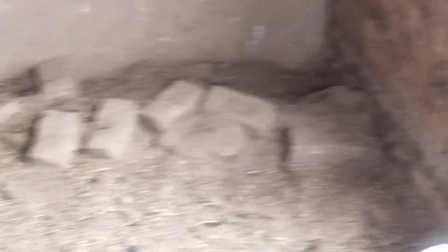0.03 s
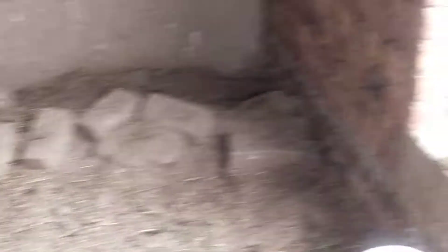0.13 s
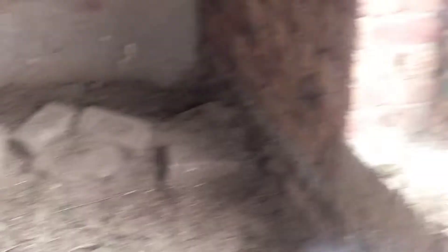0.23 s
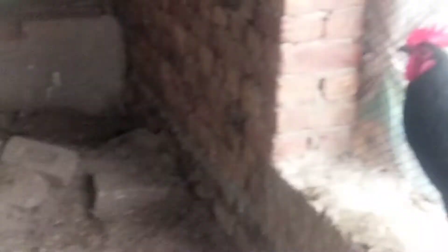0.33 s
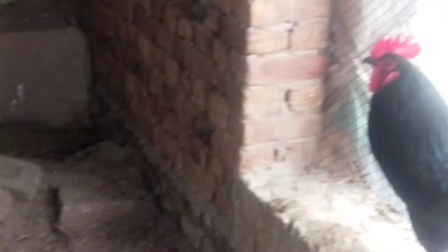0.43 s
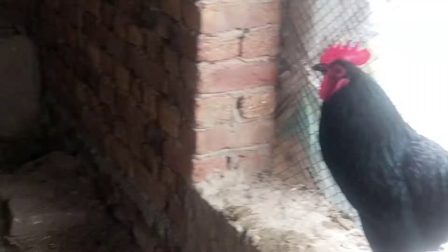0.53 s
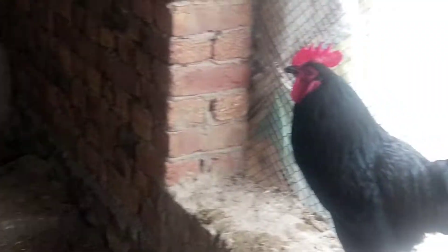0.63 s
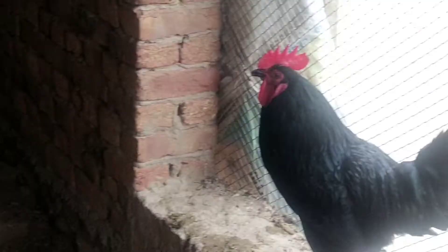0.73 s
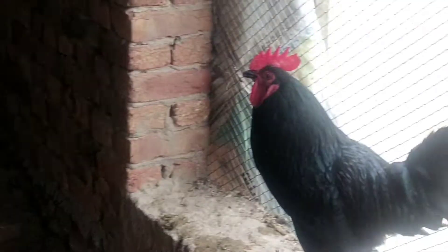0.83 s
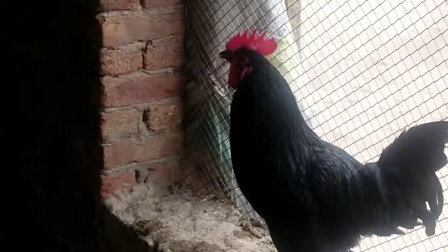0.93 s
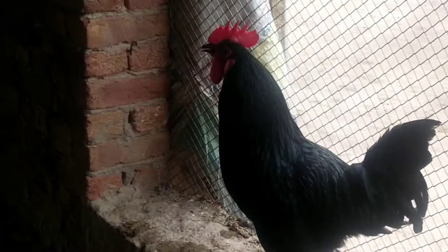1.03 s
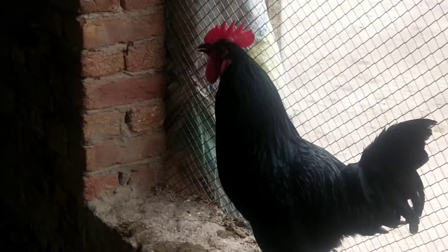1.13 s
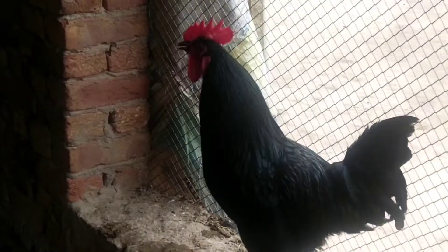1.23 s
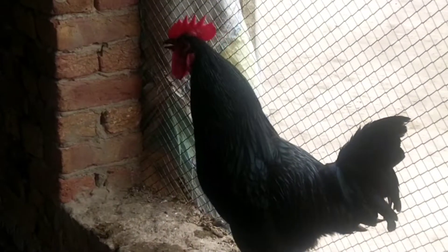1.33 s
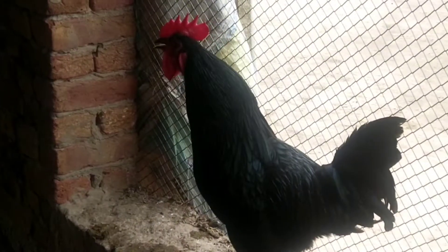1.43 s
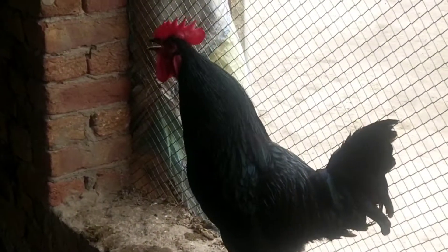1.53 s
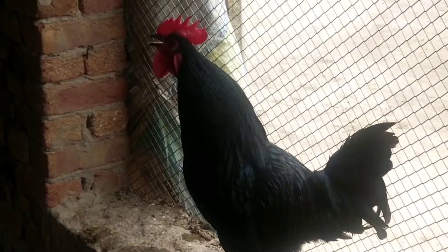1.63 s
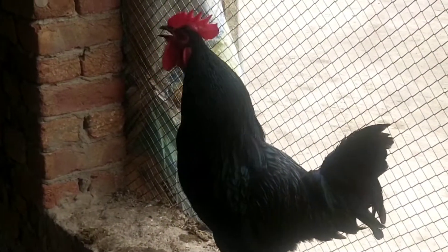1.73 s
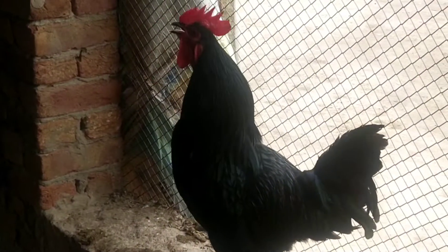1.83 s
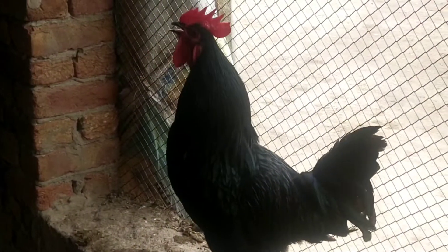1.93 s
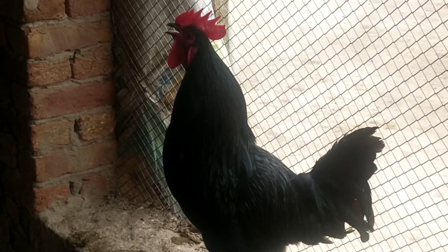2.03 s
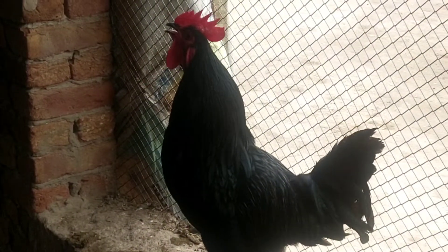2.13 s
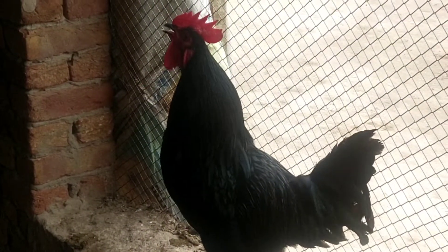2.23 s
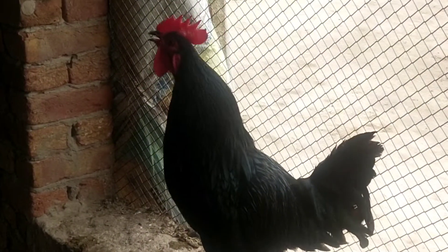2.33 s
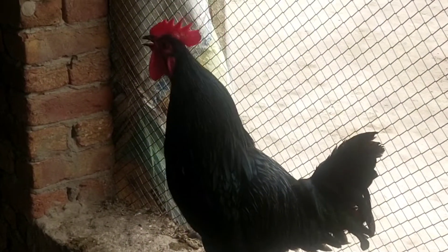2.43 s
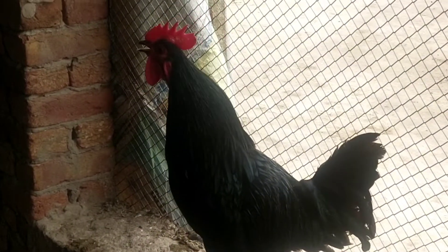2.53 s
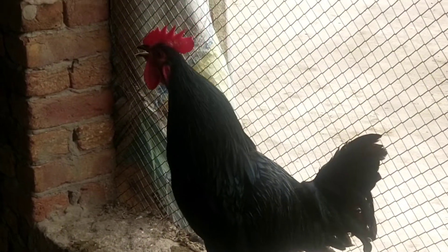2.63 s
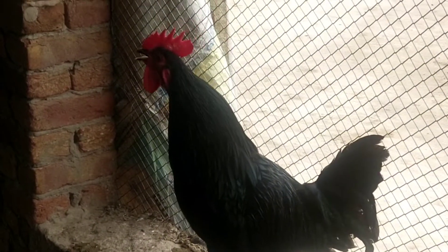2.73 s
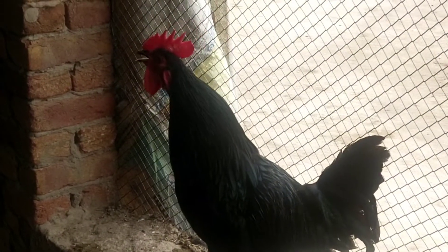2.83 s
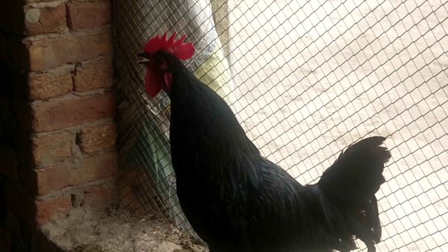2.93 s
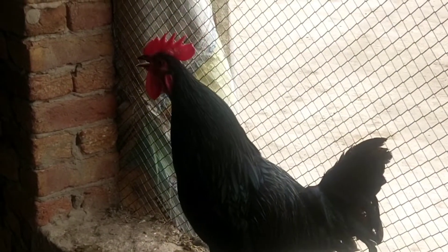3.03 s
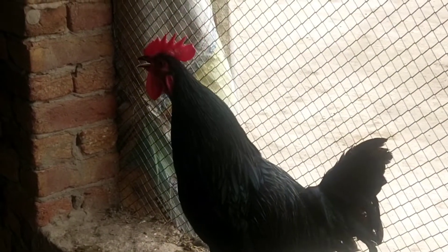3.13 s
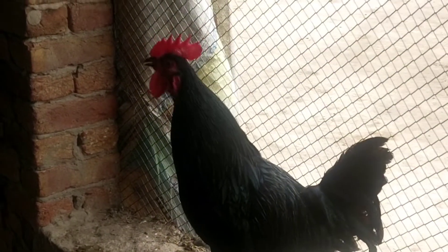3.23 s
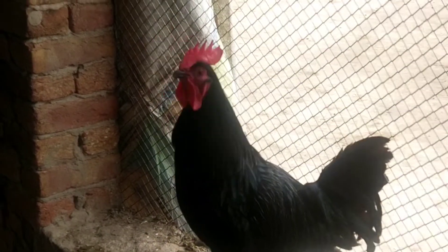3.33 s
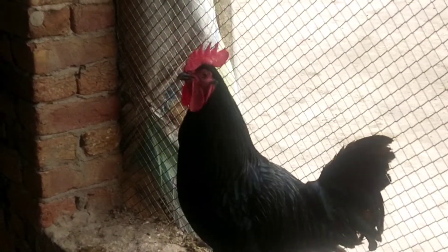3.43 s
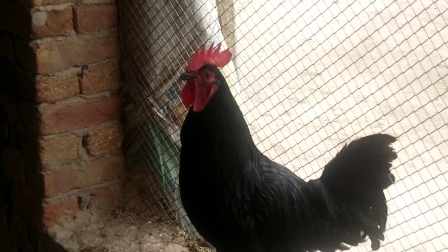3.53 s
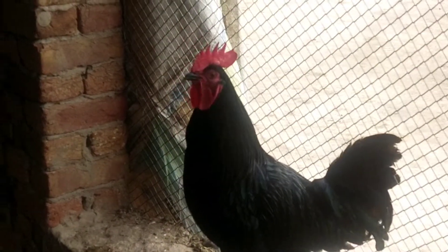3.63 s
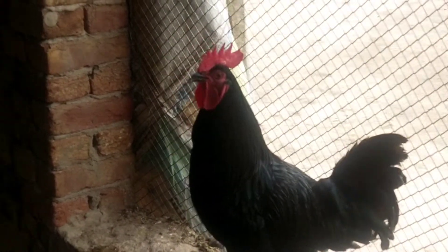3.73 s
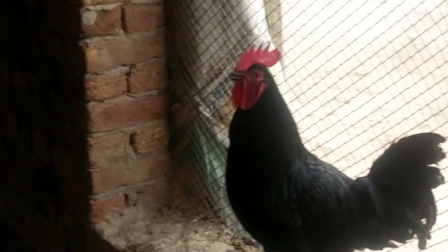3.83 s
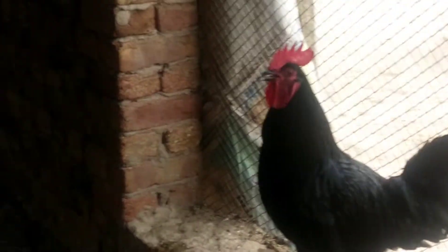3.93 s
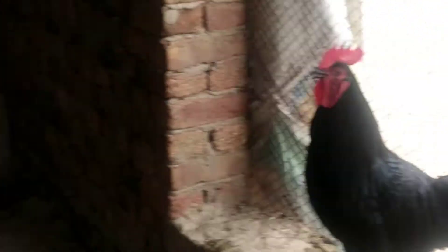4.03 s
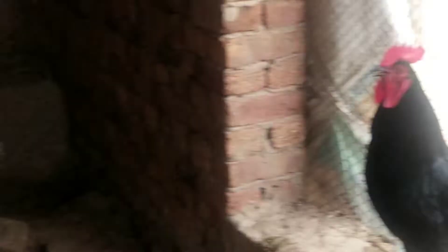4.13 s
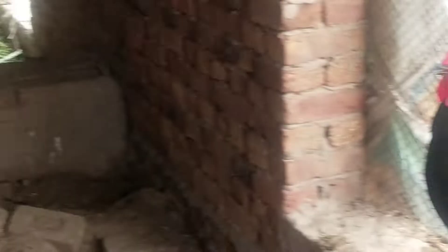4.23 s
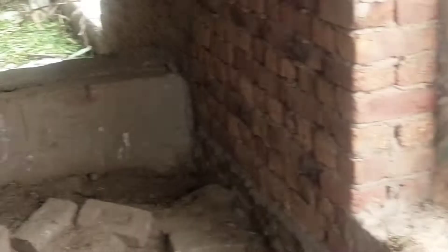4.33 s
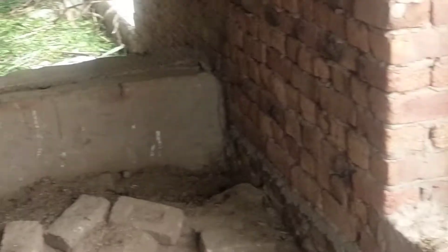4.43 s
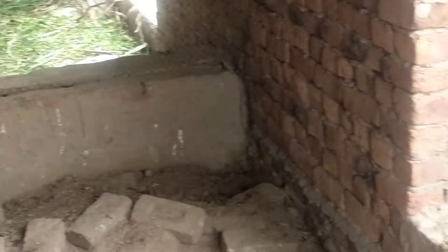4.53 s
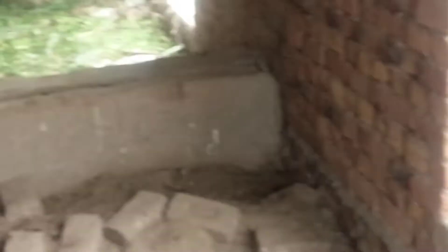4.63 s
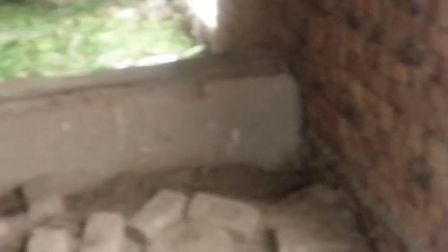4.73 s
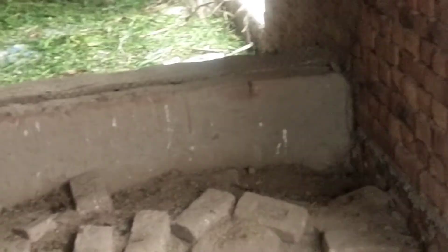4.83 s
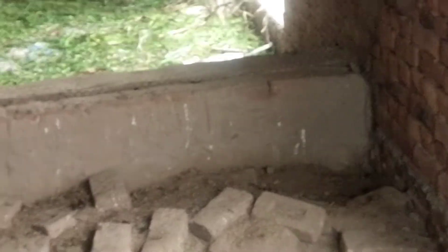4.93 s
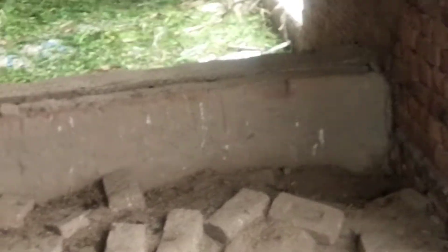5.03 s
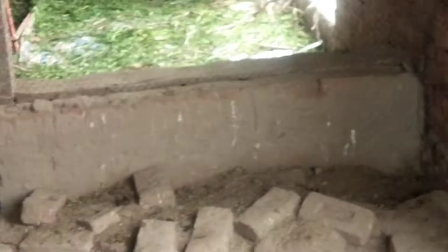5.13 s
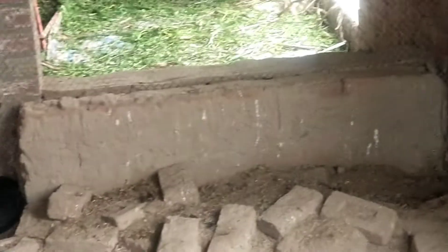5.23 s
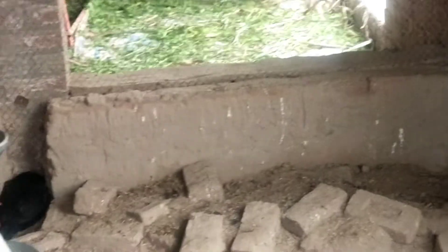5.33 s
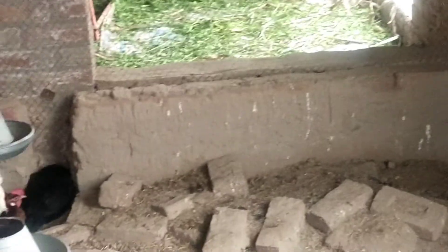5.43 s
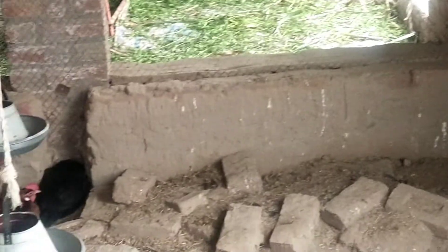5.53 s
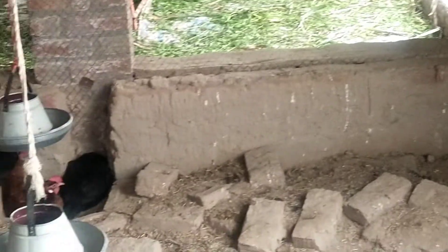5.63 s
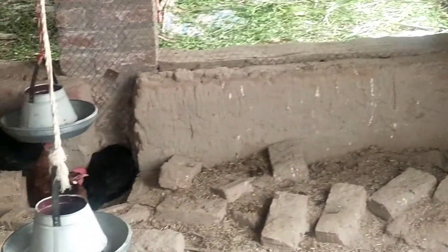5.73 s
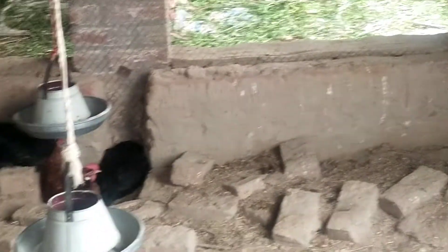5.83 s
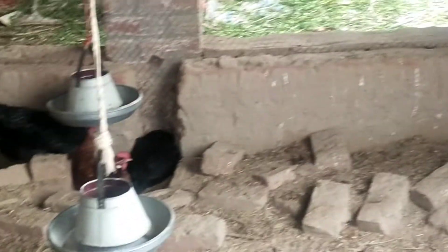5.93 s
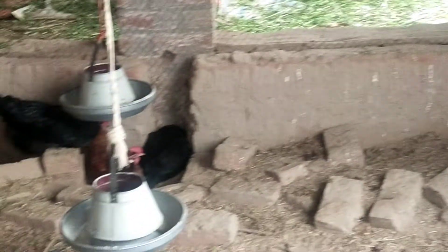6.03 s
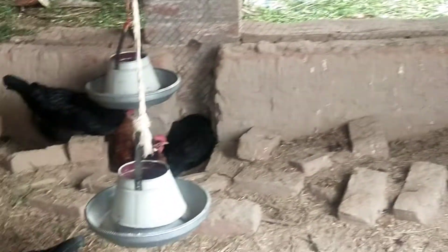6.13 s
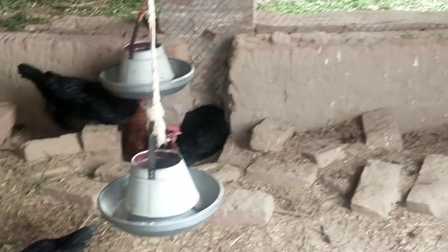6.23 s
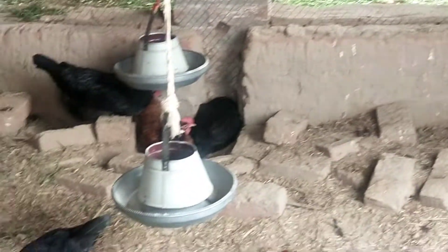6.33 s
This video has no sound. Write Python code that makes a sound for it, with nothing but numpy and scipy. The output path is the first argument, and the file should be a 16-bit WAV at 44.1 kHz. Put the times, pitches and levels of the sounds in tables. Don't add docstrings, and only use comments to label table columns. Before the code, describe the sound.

A soft yard rumble with faint hiss, rustling straw and thin distant bird wheezes opens the scene, heard through hand-held stereo microphones in a small brick pen. Dull beak taps on a tin feeder fall at about 0.1 and 0.8 s. From 1.1 to 1.55 s two hens murmur low with closed beaks. At 1.5 s a rooster a couple of metres away crows loudly: a rough, buzzing first syllable, a leap to a higher, whistling second at 1.85, a lower, growling third from 2.3, and a clearer last one from 2.85 to 3.2 s. He draws in air with a quiet low croon until 3.65 s. Near quiet follows with faint rustling. Around 4.85-5.55 s claws scratch gritty litter and small stones knock. From 5.87 to 6.25 s sharp, damped tin pecks ring out, slightly left, with a hen's short cluck near 6.0 s.

```python
import sys
import numpy as np
from scipy import signal
from scipy.fft import rfft, irfft
from scipy.io import wavfile
from scipy.ndimage import uniform_filter1d, minimum_filter1d, map_coordinates

SR = 44100
rng = np.random.default_rng(int(sys.argv[2]) if len(sys.argv) > 2 else 0)


def nominal_scale(level):
    x = np.asarray(level, float) / 20
    return 10 ** x


def file_out(sig):
    cols = np.atleast_2d(sig).T
    lim = np.clip(cols, -1, 1)
    pcm = np.round(lim * 32767).astype(np.int16)
    wavfile.write(sys.argv[1], SR, pcm)


N = 282240


def rms_one(x):
    return x / np.sqrt(np.mean(x ** 2) + 1e-20)


def in_time(rows):
    s, *columns = np.transpose(rows)
    return [np.interp(np.arange(N) / SR, s, c) for c in columns]


def gate(rows, fade_s):
    t = np.arange(N) / SR
    return np.clip(np.minimum(t - rows[0][0], rows[-1][0] - t) / fade_s, 0, 1)


def swell(s, rise_s, fall_s):
    t = np.arange(N) / SR - s
    before, after = -t / max(rise_s, .002), t / max(fall_s, .002)
    return nominal_scale(-30 * np.maximum(before, after))


def at_hz(points, hz):
    known_hz, value = np.transpose(points)
    return np.interp(np.log(hz + 1e-9), np.log(known_hz), value)


def drift(rate_hz):
    r = np.exp(-2 * np.pi * rate_hz / SR)
    noise = rng.standard_normal(N + SR)
    return rms_one(signal.lfilter([1], [1, -2 * r, r * r], noise)[SR:])


def filtered(x, order, hz, kind="low"):
    return signal.sosfilt(signal.butter(order, hz, kind, fs=SR, output="sos"), x)


def coloured(x, spectrum):
    return irfft(rfft(x) * nominal_scale(at_hz(spectrum, np.fft.rfftfreq(N, 1 / SR))), N)


def ring(clicks, hz, t60):
    r, w = nominal_scale(-60 / (t60 * SR)), 2 * np.pi * hz / SR
    return signal.lfilter([0, np.sin(w)], [1, -2 * r * np.cos(w), r * r], clicks + 1e-18)


def die_away(clicks, t60):
    return signal.lfilter([1], [1, -nominal_scale(-60 / (t60 * SR))], clicks)


# (frequency [Hz], likeness [0-1])
LIKENESS = [(60, 0.96), (150, 0.95), (380, 0.78), (950, 0.1), (2380, 0.02), (5980, 0.03), (15000, 0.03)]


def diffuse(spectrum):
    alike = np.clip(at_hz(LIKENESS, np.fft.rfftfreq(N, 1 / SR)), -1, 1)
    mid, side = rfft(coloured(rng.standard_normal((2, N)), spectrum))
    ears = np.sqrt(1 + alike) * mid + np.sqrt(1 - alike) * side * [[1], [-1]]
    return rms_one(irfft(ears, N))


def placed(x, balance, lag_s):
    hz = np.fft.rfftfreq(N, 1 / SR)
    half = nominal_scale(at_hz(balance, hz) / 2)
    left = half * np.exp(-2j * np.pi * hz * at_hz(lag_s, hz))
    return irfft(rfft(x) * np.array([left, 1 / half]), N)


PEN_T60_S, WALL_CUT_HZ = 0.3, 1700


def pen(x):
    t = np.arange(SR // 2) / SR
    onset = np.clip((t - .004) / 0.0015, 0, 1)
    noise = diffuse([(120, -28.5), (300, -0.5), (16000, 10.0)])[:, :len(t)] * onset
    dull = filtered(noise, 1, WALL_CUT_HZ)
    tail = dull * nominal_scale(-60 * t / PEN_T60_S) + 0.15 * (noise - dull) * nominal_scale(-110 * t / PEN_T60_S)
    return signal.fftconvolve(x[None], rms_one(tail) / np.sqrt(len(t)), axes=1)[:, :N]


# (time [s], level [dB])
YARD = [(0.0, -50), (0.05, -47.5), (0.39, -51.5), (0.46, -55.5), (0.71, -47.5), (1.87, -48.5), (1.96, -62),
        (2.62, -54), (3.92, -72.5), (4.06, -57.5), (4.15, -73.5), (6.02, -63.5), (6.11, -56.5), (6.4, -54)]
# (frequency [Hz], level [dB per Hz])
RUMBLE = [(18, -60.5), (30, -30), (52, -23.5), (108, -13), (144, -11), (208, -5.5), (402, -11),
          (524, -24.5), (700, -14.5), (910, -36.5), (1540, -120)]
# (frequency [Hz], level [dB per Hz])
AIR = [(260, -29), (450, -19.5), (664, -11), (979, -8), (1340, -12.5), (2030, -14.5), (2540, -14.5),
       (3020, -18.5), (3340, -18), (5450, -29.5), (9000, -33.5), (11700, -52.5), (19800, -120)]
# (frequency [Hz], level [dB per Hz])
RUSTLE = [(3000, -42), (5000, -7.5), (7000, -1), (11000, -7), (15500, -3), (18000, -31.5)]
# (frequency [Hz], level [dB per Hz])
HISS = [(1760, -44.5), (3000, -16.5), (4090, -4.5), (4470, -16.5), (7590, -7), (11300, -17.5),
        (15500, -12.5)]
# (start [s], end [s], level [dB])
CHEST = (1.525, 2.9, -59)
# (time [s], rustle level [dB], spread [s], duller air level [dB])
STIRS = [(.02, -62.5, 0.24, -56.5), (0.292, -63.5, 0.2, -95), (.86, -84.5, 0.14, -58.5),
         (1.21, -64, 0.18, -64), (1.416, -53, 0.17, -59), (3.309, -73.5, 0.19, -50.5),
         (3.66, -82, 0.15, -84), (3.881, -73.5, 0.46, -77.5), (4.1, -71, 0.37, -71.5),
         (4.92, -93.5, 0.56, -62), (5.28, -86, 0.12, -57.5), (5.48, -96, 0.17, -58),
         (5.751, -65.5, 0.046, -69), (5.882, -70.5, 0.12, -68), (6.02, -53.5, 0.033, -73),
         (6.21, -64.5, 0.37, -65), (6.379, -62, 0.54, -62)]
RUMBLE_DB, DEEP_DB, AIR_DB = -3.5, -8, -15
HISS_DB = -77.5


def yard():
    yard_db, = in_time(YARD)
    boom = nominal_scale(yard_db + RUMBLE_DB) + nominal_scale(CHEST[2]) * gate([CHEST[:1], CHEST[1:]], 0.16)
    rumble = diffuse(RUMBLE)
    deep = signal.sosfiltfilt(signal.butter(3, 110, fs=SR, output="sos"), rumble)
    low = boom * nominal_scale(2.0 * drift(1.5)) * rms_one(rumble - deep)
    low = low + nominal_scale(yard_db + DEEP_DB + 2.0 * drift(13)) * rms_one(deep)
    stirs = np.array([swell(s, spread_s, spread_s) for s, _, spread_s, _ in STIRS]).T
    _, rustle_db, _, puff_db = np.transpose(STIRS)
    rustle, puffs = stirs @ nominal_scale(rustle_db), stirs @ nominal_scale(puff_db)
    air = (nominal_scale(yard_db + AIR_DB) + puffs) * nominal_scale(0.67 * drift(19)) * diffuse(AIR)
    air = air + rustle * nominal_scale(0.54 * drift(30)) * diffuse(RUSTLE)
    return low + (air + nominal_scale(HISS_DB) * diffuse(HISS) + wheezes()) * nominal_scale([[1.5], [-1.5]])


# (start [s], end [s], pitch [Hz], width [Hz], level [dB])
WHEEZES = [(.05, .6, 2620, 800, -69), (.55, 1.2, 2620, 900, -74), (.05, 1.3, 2300, 500, -74),
           (.1, 1.4, 1330, 600, -72), (5.24, 5.28, 1780, 260, -67), (3.89, 4.0, 1680, 600, -66),
           (3.97, 4.14, 1850, 900, -70), (3.89, 4.02, 2800, 900, -69), (3.89, 4.13, 3300, 2500, -73),
           (5.5, 5.87, 2320, 200, -75), (5.0, 5.3, 4100, 150, -88)]


def wheezes():
    out = np.zeros((2, N))
    for start, end, hz, width, db in WHEEZES:
        t60 = 9.5 / width
        narrow = ring(ring(rng.standard_normal((2, N)), hz, t60), hz, t60)
        out += nominal_scale(db + 0.59 * drift(3.8)) * gate([(start,), (end,)], 0.0052) * rms_one(narrow)
    return out


# (time [s], peak level [dB], left over right [dB], bright snap level [dB])
PECKS = [
    (0.091, -40, 9, -20),
    (0.794, -37, 5, -20),
    (0.854, -48, 23, -20),
    (5.7511, -68, 8, -10.5),
    (5.8671, -34.5, 7.5, -23),
    (6.0074, -26.5, 6.5, -8.5),
    (6.1659, -28, 4.5, -17),
    (6.213, -54, 7.5, 5),
    (6.2474, -30.5, 5.5, -13.5),
]
# (frequency [Hz], level [dB], ring time to -60 dB [s])
FEEDER = [(1820, -21, 0.061), (1890, -39, 0.31), (2166, 7, 0.26), (2670, 10, 0.25), (2836, 6, 0.23),
          (3120, -31, 0.19), (4030, -20, 0.047), (3910, 10, 0.82), (5335, -37, 5.0), (5640, -39, 0.34),
          (5560, -33, 0.18), (6340, -30, 0.43), (7470, -22.5, 0.12), (8300, -39, 0.15)]
# (frequency [Hz], level [dB per Hz])
CRACK = [(180, -58), (300, -1.5), (907, -6), (1240, -30), (1510, -5.5), (2790, 0), (5950, -15),
         (6900, -1.5), (8700, -24), (15500, -25.5)]
# (frequency [Hz], level [dB per Hz])
SNAP = [(4000, -31.5), (6000, -5), (8000, 0.5), (12000, -3.5), (15500, -17)]
# (until [s], cut [Hz])
TURNED_AWAY = (1.4, 3570)
PECK_RISE_S, SNAP_T60_S = .0015, 0.056


def pecks():
    at = [round(row[0] * SR) for row in PECKS]
    peak_db, pan_db, snap_db = np.array(PECKS)[:, 1:].T
    ears = nominal_scale(np.outer([.5, -.5], pan_db))

    def clicks(level_db):
        x = np.zeros((2, N))
        x[:, at] = nominal_scale(level_db) * ears
        return x

    luck = rng.normal(0, 1.0, (len(at), len(FEEDER)))
    out = np.zeros((2, N))
    for k, ((hz, db, t60), own_db) in enumerate(zip(FEEDER, luck.T)):
        struck = clicks(peak_db + db - 19.5 + own_db) * (-1) ** k
        out += ring(struck, hz, np.clip(t60, .015, .028))
    rise = np.exp(-1 / (PECK_RISE_S * SR))
    grain = signal.lfilter([1 - rise], [1, -rise], clicks(peak_db - 6) + 1e-18)
    out = out + (die_away(grain, .07) + 0.021 * die_away(grain, .3)) * diffuse(CRACK)
    out = out + die_away(clicks(peak_db - 6 + snap_db), SNAP_T60_S) * diffuse(SNAP)
    until_s, cut_hz = TURNED_AWAY
    return np.where(np.arange(N) < until_s * SR, filtered(out, 4, cut_hz), out)


def hum(rows, orders, wobble, fade_s=0.17, sway_db=3.0):
    pitch, level_db = in_time(rows)
    phase = np.cumsum(2 * np.pi * pitch * (1 + wobble * drift(40)) / SR)
    tone = 0
    for k, db in orders:
        tone = tone + nominal_scale(db - orders[0][1] + sway_db * drift(9.1)) * np.sin(k * phase + k * k)
    return np.sqrt(2) * nominal_scale(level_db) * gate(rows, fade_s) * tone


# (time [s], pitch [Hz], level [dB])
MURMUR = [(1.08, 196.7, -52), (1.116, 198, -46), (1.182, 214, -47.5), (1.4, 238.4, -46.5),
          (1.494, 211, -39.5), (1.51, 223, -82), (1.55, 212, -66)]
# (multiple [1], level [dB])
MURMUR_ORDERS = [(1, 8.5), (2, -3.5), (3, 2), (4, -13.5), (5, -18)]


def murmur():
    return hum(MURMUR, MURMUR_ORDERS, wobble=0.005)


# (time [s], pitch [Hz], level [dB])
ANSWER = [(1.25, 315, -61), (1.32, 323, -43.5), (1.42, 340, -47.5), (1.5, 324, -43), (1.56, 320, -67.5)]
# (multiple [1], level [dB])
ANSWER_ORDERS = [(1, 1), (2, -9), (3, -16), (4, -17), (6, -20)]


def answer():
    return hum(ANSWER, ANSWER_ORDERS, wobble=0.027)


# (start [s], half-pitch lines [dB], rasp under effort [dB])
REGIMES = [
    (1.501, -3.5, -23),
    (1.835, -31, -23),
    (1.96, -42, -24.5),
    (2.201, -30, -26),
    (2.297, -41.5, -16.5),
    (2.45, -0.5, -27),
    (2.619, 0.5, -27.5),
    (2.863, -25.5, -29.5),
]
SETTLE_S = .03


def by_regime(table):
    starts = np.array(REGIMES)[:, 0]
    now = np.maximum(np.searchsorted(starts, np.arange(N) / SR) - 1, 0)
    return [uniform_filter1d(c[now], size=round(SETTLE_S * SR)) for c in np.transpose(table).astype(float)]


# (pitch wobble [0-1], breath level [dB])
UNSTEADY = [(.24, -14), (.27, -17), (.3, -16), (.13, -23), (.14, -18), (.025, -23), (.025, -23), (.04, -31)]
# (start [s], end [s], strength [0-1])
BREAKS = [
    (1.48, 1.57, .7),
    (1.715, 1.85, .75),
    (2.28, 2.33, .4),
    (2.41, 2.47, .15),
    (2.83, 2.885, .12),
    (3.14, 3.3, .7),
]
BREAK_FADE_S, BREAK_WOBBLE, BREAK_BREATH_DB, BREAK_HALF_DB = .03, 1.05, -3, -8
THROB_DB_PER_WOBBLE, THROB_TOP_DB = 17, 6.5


def membranes():
    half_db, rasp_db, wobble, breath_db = by_regime(np.hstack([REGIMES, UNSTEADY])[:, 1:])
    broken = sum(k * gate([(a,), (b,)], BREAK_FADE_S) for a, b, k in BREAKS)
    wobble = wobble + broken * (BREAK_WOBBLE - wobble)
    throb_db = np.minimum(THROB_DB_PER_WOBBLE * wobble, THROB_TOP_DB)
    breath_db = breath_db + broken * (BREAK_BREATH_DB - breath_db)
    half_db = half_db + broken * (BREAK_HALF_DB - half_db)
    return wobble, throb_db, breath_db, half_db, rasp_db


# (first band [Hz], its gain [dB], second band [Hz], its gain [dB])
MOUTH = [(2230, -3, 1700, -5), (2530, 10, 1500, 7), (3130, 0.5, 1520, -2), (3200, 2.5, 1520, -4),
         (1043, 8, 1100, -3.5), (1850, 3.5, 2850, -4.5), (1620, 9.5, 1100, -3.5), (2240, 5, 2950, -2.5)]
MOUTH_WIDTH_HZ = 300


def mouth(hz, part):
    first_hz, first_db, second_hz, second_db = [c[part] for c in by_regime(MOUTH)]
    first_gain_db = first_db * np.exp(-((hz - first_hz) / MOUTH_WIDTH_HZ) ** 2)
    return first_gain_db + second_db * np.exp(-((hz - second_hz) / MOUTH_WIDTH_HZ) ** 2)


# (frequency [Hz], level [dB])
THROAT = [(300, -40.5), (600, -41), (800, 7), (1000, -12), (1300, 2), (1650, -6), (1950, 0.5), (2250, -6),
          (2600, -23.5), (2950, -10), (3500, -22.5), (6600, -24.5), (8800, -35.5), (15500, -34)]
LOW_THROB_SHARE = .25


def partials(pitch, phase, half_db, throb_db, throbs, part):
    uneven_db = rng.normal(0, 2.5, 56) * (np.arange(56) > 11)
    bands, power = np.zeros((3, len(pitch))), np.zeros((3, len(pitch))) + 1e-12
    for k, start in enumerate(rng.uniform(0, 2 * np.pi, 56), 1):
        hz = k * pitch / 2
        height = nominal_scale(at_hz(THROAT, hz) + half_db * (k % 2) + uneven_db[k - 1]) * (hz < 16000)
        height *= nominal_scale(mouth(hz, part))
        band = np.where(hz > 3750, 2, int(k > 2))
        for b in range(3):
            depth_db = throb_db * (LOW_THROB_SHARE if b == 0 else 1) + 3.7 * (b == 2)
            bands[b] += (band == b) * height * nominal_scale(depth_db * throbs[k % 5]) * np.sin(k * phase + start)
            power[b] += (band == b) * height ** 2 / 2
    return bands / np.sqrt(power)


# (time [s], pitch [Hz])
WINDPIPE_HZ = [(1.55, 1668), (1.75, 1723), (1.865, 1677), (1.92, 1792), (1.965, 1679), (2.03, 1709),
               (2.08, 1731), (2.13, 1752), (2.19, 1640)]
# (start [s], end [s], level over the upper partials [dB])
WINDPIPE = [
    (1.545, 1.616, -0.5),
    (1.611, 1.78, -2.5),
    (1.833, 1.957, 4),
    (1.934, 2.065, 2.5),
    (2.061, 2.191, 8.5),
]


def windpipe(phase, throb, part):
    hz = in_time(WINDPIPE_HZ)[0][part] * (1 + .016 * drift(60)[part])
    turn = np.cumsum(2 * np.pi * hz / SR)
    tone = np.sin(turn) + nominal_scale(-21.5) * np.sin(2 * 2 * turn)
    chopped = tone * (1 + 0.38 * np.cos(2 * phase) + 0.25 * np.cos(4 * phase))
    gain = sum(nominal_scale(db) * gate([(a,), (b,)], 0.0038) for a, b, db in WINDPIPE)
    return gain[part] * chopped * throb


def breath(part):
    air = coloured(rng.standard_normal((2, N)), THROAT)
    edges = [([420, 950], "band"), ([950, 3750], "band"), (4150, "high")]
    return [rms_one(filtered(air, 3, hz, kind))[:, part] for hz, kind in edges]


# (time [s], pitch [Hz], effort [dB], beak opening as upper over lowest partial [dB])
FIRST = [(1.52, 561.6, -47, -25.5), (1.548, 590.7, -27.5, -5), (1.57, 631, -20.5, -2), (1.67, 636, -14, -3),
         (1.698, 687.5, -14.5, -9.5), (1.754, 698, -23, -0.5), (1.83, 715, -47, 1.5)]
# (time [s], pitch [Hz], effort [dB], beak opening [dB])
SECOND = [(1.844, 743, -30, -11), (1.862, 753.6, -1.5, -19), (1.874, 840.8, -8.5, -0.5),
          (1.917, 866.4, -12.5, 13), (1.94, 822.6, -16, -8), (1.957, 774.6, -13, -16.5),
          (2.104, 800.2, -11.5, -11), (2.276, 742.4, -11.5, -17), (2.291, 722.6, -18, -4.5)]
# (time [s], pitch [Hz], effort [dB], beak opening [dB])
THIRD = [(2.302, 589.4, -20, 1.5), (2.33, 508.5, -26, 8.5), (2.367, 516.5, -25.5, 4.5),
         (2.423, 543.7, -22, 5.5), (2.464, 637, -17.5, -2), (2.534, 643.2, -16.5, 1),
         (2.722, 645.5, -10.5, 1.5), (2.817, 652.8, -15, -3), (2.843, 666, -23, -1)]
# (time [s], pitch [Hz], effort [dB], beak opening [dB])
FOURTH = [(2.848, 723, -10, -17), (2.86, 742, -7.5, -15.5), (2.897, 743.7, -19.5, -8.5),
          (3.054, 722.4, -16.5, -5.5), (3.104, 727, -14.5, -3), (3.137, 716, -12, -12.5),
          (3.166, 689, -10.5, -14), (3.182, 681, -16, -4.5), (3.214, 720.5, -44.5, -7)]
# (time [s], depth [dB])
CATCHES = [(1.622, -6), (1.655, -8), (1.678, -9), (1.7, -7), (1.725, -8), (1.87, -9), (1.9, -8),
           (1.926, -10), (1.948, -14), (2.0, -4), (2.027, -14), (2.053, -18), (2.08, -16), (2.108, -12),
           (2.137, -12), (2.166, -20), (2.188, -3), (2.217, -9), (2.289, -10), (2.846, -16), (2.864, -20),
           (2.878, -16), (3.146, -12), (3.163, -10), (3.177, -10)]
# (frequency [Hz], width [Hz], gain [dB])
HOLLOWS = [(3725, 300, -25), (2914, 13, -13), (8700, 230, -1), (10500, 150, -5), (320.6, 203, -18.5),
           (3227, 50, -31.5), (6750, 250, 1), (4094, 56, -10), (4200, 74, -1), (4850, 150, -8.5),
           (5517, 45, -14), (6060, 300, -1), (7660, 43, 5), (8050, 100, -7.5), (9080, 340, -9),
           (9700, 200, -6.5)]
CATCH_S, CROW_FLOOR_HZ = .006, 380


def crow():
    rows = FIRST + SECOND + THIRD + FOURTH
    part = slice(round(rows[0][0] * SR), round(rows[-1][0] * SR))
    pitch, effort_db, open_db = [c[part] for c in in_time(rows)]
    wobble, throb_db, breath_db, half_db, under_db = [c[part] for c in membranes()]
    low_db = effort_db - 10 * np.log10(1 + nominal_scale(open_db) ** 2)
    beak_db = low_db + open_db
    rasp_db = uniform_filter1d(effort_db, size=900) + under_db
    shaky = pitch * (1 + wobble * (.06 * drift(60) + .05 * drift(250))[part])
    phase = np.cumsum(np.pi * shaky / SR)
    throbs = [np.clip(drift(55)[part], -3, .8) for _ in range(5)]
    low, beak, rasp = partials(pitch, phase, half_db, throb_db, throbs, part)
    pipe = windpipe(phase, nominal_scale(throb_db * throbs[0]), part)
    low_air, beak_air, rasp_air = breath(part)
    puff = 1 + 0.75 * np.cos(phase) + 0.079 * np.cos(2 * phase)
    t = np.arange(N)[part] / SR
    caught = np.prod([1 - (1 - nominal_scale(db)) * np.exp(-((t - s) / CATCH_S) ** 2) for s, db in CATCHES], axis=0)
    voice = nominal_scale(low_db) * caught * (low + nominal_scale(breath_db - 2.0) * low_air)
    voice += nominal_scale(beak_db) * (beak + pipe + nominal_scale(breath_db) * beak_air * puff)
    steady_rasp = np.clip(1 - 1.2 * wobble, .2, 1) * rasp
    voice += nominal_scale(rasp_db) * (steady_rasp + nominal_scale(.5 * breath_db + 3.5) * rasp_air * puff)
    out = np.zeros((2, N))
    out[:, part] = voice
    hz = np.fft.rfftfreq(N, 1 / SR)
    hollow_db = sum(db * np.exp(-((hz - at) / width) ** 2) for at, width, db in HOLLOWS)
    throat = nominal_scale(hollow_db) / np.sqrt(1 + (CROW_FLOOR_HZ / (hz + 1)) ** 10)
    return irfft(rfft(out * gate(rows, 0.016)) * throat, N)


# (frequency [Hz], level [dB])
CROW_BALANCE = [(290, 3), (646, -6), (740, -1), (970, 9), (1290, 4.5), (1620, 10), (2900, 2), (6800, 5)]
# (frequency [Hz], lag [s])
CROW_LAG_S = [(646, .00025), (740, .00002), (970, -.00012), (1290, .0003), (1615, .00024), (1935, .00035),
              (2260, .00041), (3000, .00033)]
# (time [s], extra lag of the left ear [ms])
HEAD = [(1.5, -0.041), (1.8, -0.012), (2.0, -0.061), (2.3, -0.041), (2.5, -0.015), (2.8, 0.00052),
        (2.9, -0.038), (3.2, -0.019)]
HEAD_SHAKE_MS = 0.022


def from_rooster(x):
    left, right = placed(x, CROW_BALANCE, CROW_LAG_S)
    lag = (in_time(HEAD)[0] + HEAD_SHAKE_MS * drift(12)) * SR / 1000
    return np.array([map_coordinates(left, [np.arange(N) - lag], order=3), right])


# (time [s], level [dB], rise [s], fall [s])
GULPS = [
    (1.799, -48, 0.17, 0.21),
    (1.87, -44, .08, 0.11),
    (2.1, -58.5, 0.55, 0.32),
    (2.38, -51.5, 0.36, 0.31),
    (3.19, -43, .1, 0.099),
    (3.261, -54.5, .1, 0.18),
]
# (lowest [Hz], highest [Hz])
GULP_HZ = (284, 600)


def gulps():
    air = filtered(rng.standard_normal(N), 3, GULP_HZ, "band")
    return rms_one(air) * sum(nominal_scale(db) * swell(s, rise_s, fall_s) for s, db, rise_s, fall_s in GULPS)


# (time [s], pitch [Hz], level [dB])
CROON = [(3.275, 324.3, -57.5), (3.287, 308, -46), (3.455, 318, -50.5), (3.521, 330.7, -56),
         (3.557, 329.1, -54), (3.615, 316.8, -53.5), (3.645, 325, -63.5)]
# (multiple [1], level [dB])
CROON_ORDERS = [(1, 0.5), (2, 3), (3, 3.5), (4, -21), (5, -24), (6, -12), (7, -29.5), (8, -66), (9, -56),
                (10, -49)]


def croon():
    return hum(CROON, CROON_ORDERS, wobble=.004, fade_s=.02, sway_db=1.2)


# (time [s], peak level [dB], pitch [Hz])
KNOCKS = [(3.65, -40, 314), (3.653, -44, 1600), (3.69, -56, 1350), (3.708, -48, 302), (4.049, -57, 1844),
          (4.379, -56, 1200), (4.515, -52, 1500), (4.55, -52, 473), (4.697, -50, 746), (4.846, -31, 1150),
          (4.865, -30, 810), (4.906, -21, 760), (4.914, -31, 4000), (4.92, -22, 1300), (4.928, -23, 1310),
          (4.952, -26, 890), (4.972, -26, 2450), (4.981, -29, 1950), (5.028, -40, 2040), (5.298, -33, 1260),
          (5.446, -31, 614), (5.468, -31, 905), (5.473, -30, 726), (5.485, -31, 730), (5.501, -35, 1900),
          (5.526, -33, 1860), (5.554, -41, 1640), (5.882, -48, 2800)]


def knocks():
    out = np.zeros(N)
    for s, db, hz in KNOCKS:
        click = np.zeros(N)
        contact = np.hanning(round(.6 * SR / hz) + 2)
        click[round(s * SR):][:len(contact)] = nominal_scale(db + 5) * contact / contact.sum()
        out += ring(click, hz, 14.0 / hz) + .4 * ring(click, 1.7 * hz, 8.0 / hz)
    return filtered(out, 3, 3500)


# (time of the peak [s], level [dB], rise [s], brightness [dB])
SCRATCH = [(3.719, -59, 0.01, -48), (3.901, -76, 0.012, 31.5), (3.98, -69.5, 0.26, 17),
           (4.049, -58.5, 0.85, -9), (4.501, -50, 0.033, -13), (4.56, -63, 0.12, 2), (4.695, -64, .015, -9),
           (4.772, -51, 0.27, 3.5), (4.853, -28, 0.01, -12), (4.919, -28, 0.11, 8),
           (4.965, -53.5, 0.079, 20), (5.06, -53.5, 0.24, -1.5), (5.15, -63, 0.33, 7),
           (5.281, -41.5, 0.005, -8), (5.298, -37, 0.028, -10.5), (5.354, -34.5, 0.086, -3),
           (5.447, -39.5, 0.0042, 9), (5.475, -37.5, 0.12, 3), (5.54, -53, 0.14, 14),
           (5.661, -56.5, 0.36, 2), (5.964, -37, 0.016, -7), (5.995, -42, 0.081, -5)]
# (frequency [Hz], level [dB])
LITTER = [(200, -23), (420, 2), (700, 15), (1100, 9), (1700, 5), (2400, 2), (3200, -31), (4500, -83)]
SCRATCH_FALL_S = 0.031


def scratching(per_s, spread_db):
    sizes = nominal_scale(spread_db * np.minimum(rng.exponential(1, N), 4)) * rng.choice([-1, 1], N)
    born = rng.random(N) < per_s * nominal_scale(3 * drift(35)) / SR
    pitches, dealt = np.geomspace(250, 8000, 20), rng.integers(0, 20, N)
    grains = []
    for k, hz in enumerate(pitches):
        grains.append(nominal_scale(at_hz(LITTER, hz)) * hz * ring(sizes * born * (dealt == k), hz, 9.0 / hz))
    grains = np.array(grains)
    dull, bright = grains[pitches < 1500].sum(0), grains[pitches >= 1500].sum(0)
    size = np.sqrt(np.mean((dull + bright) ** 2))
    out = np.zeros(N)
    for s, level_db, rise_s, bright_db in SCRATCH:
        stroke = swell(s, rise_s, SCRATCH_FALL_S) * nominal_scale(level_db)
        out += stroke * (dull + nominal_scale(bright_db) * bright) / size
    return filtered(out, 5, [220, 2800], "band")


# (time [s], pitch [Hz], level [dB])
CLUCK = [(5.955, 740, -52), (5.963, 750, -38), (5.99, 765, -38), (6.014, 750, -41)]
# (multiple [1], level [dB])
CLUCK_ORDERS = [(1, 0), (2, -11.5), (3, -18)]


def cluck():
    return hum(CLUCK, CLUCK_ORDERS, wobble=0.0328, fade_s=0.0036)


def scene():
    taps, rooster, indrawn = pecks(), crow(), croon()
    hens = murmur() + answer() + knocks() + scratching(per_s=2400, spread_db=4.0) + cluck()
    walls = pen(nominal_scale(-12.5) * rooster.mean(0) + nominal_scale(-10) * indrawn)
    far_walls = pen(nominal_scale(-9.5) * hens + nominal_scale(-4.5) * taps.mean(0)) * nominal_scale([[1.2], [-1.2]])
    near = from_rooster(rooster + indrawn + gulps()) * nominal_scale(1.5)
    far = placed(hens, [(100, 0.86), (9000, 13.0)], [(1000, 0.0001)]) * nominal_scale(-9.0)
    return near + far + taps + walls + far_walls + yard()


def band_limit(x):
    return signal.sosfilt(signal.butter(12, 15300, fs=SR, output="sos"), x)


def record(dry):
    thin = filtered(dry, 8, 57, "high") + nominal_scale(-22.0) * dry
    room_left = np.minimum(1, .88 / (np.abs(thin).max(0) + 1e-9))
    gain = uniform_filter1d(minimum_filter1d(room_left, size=661), size=661)
    return band_limit(thin * gain)


dry = scene()
out = record(dry)
file_out(out)
```